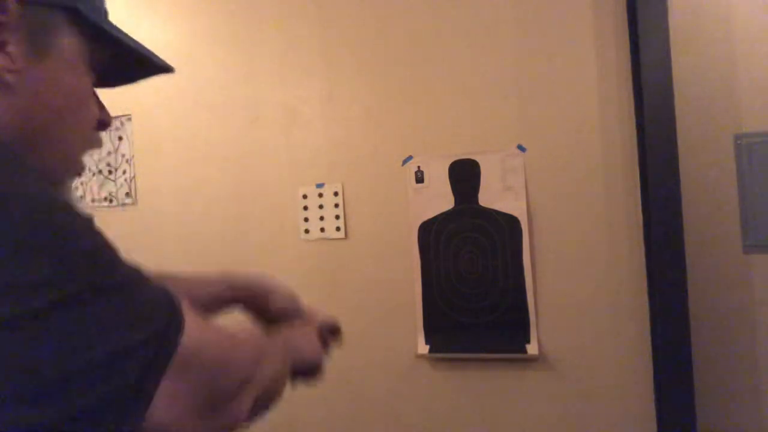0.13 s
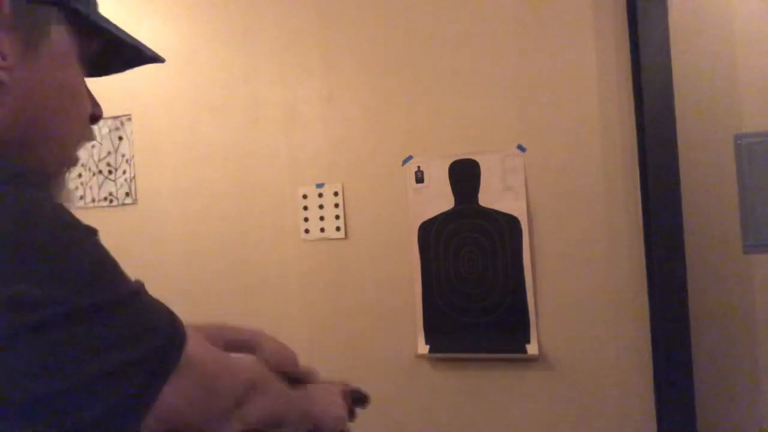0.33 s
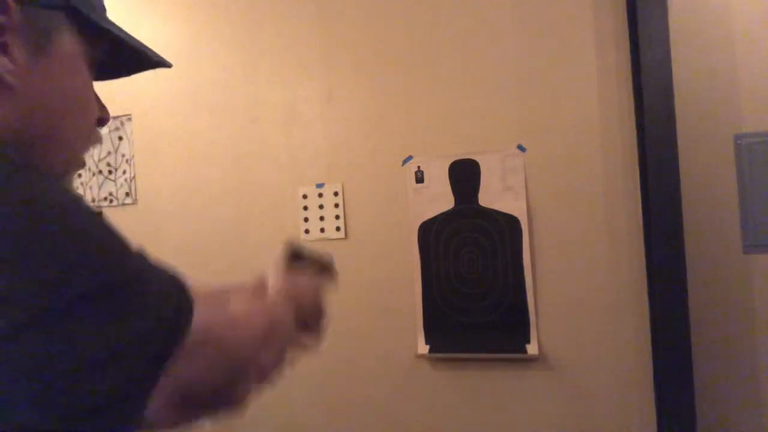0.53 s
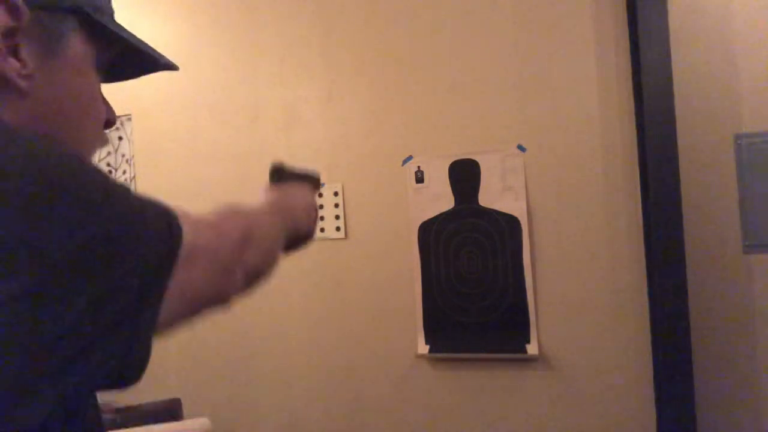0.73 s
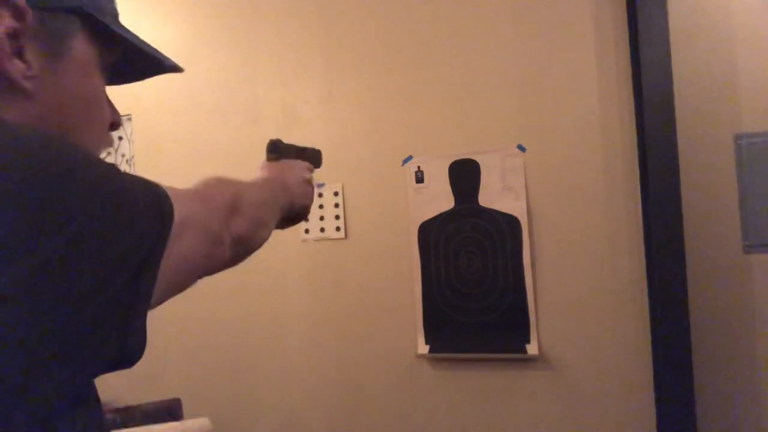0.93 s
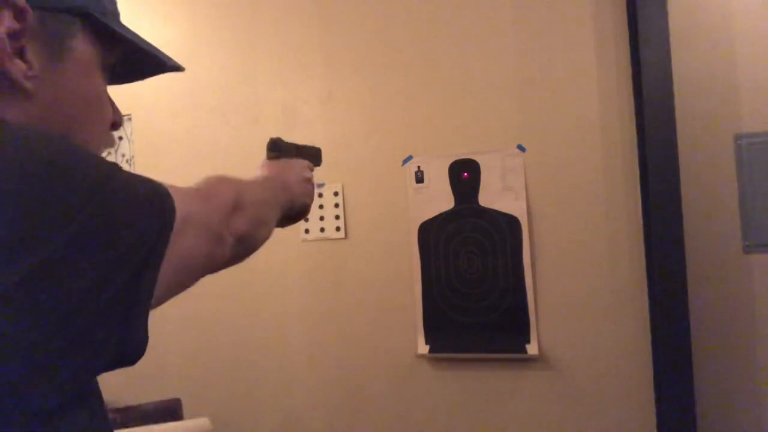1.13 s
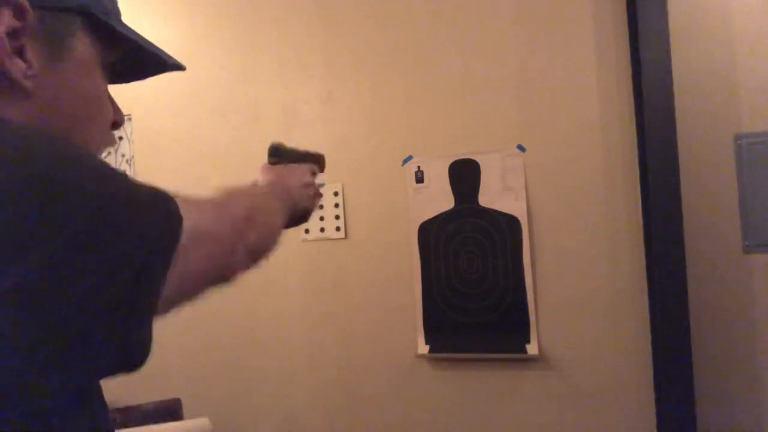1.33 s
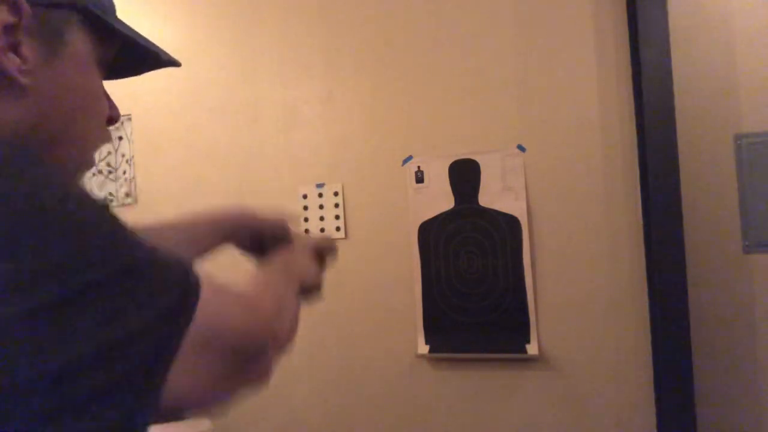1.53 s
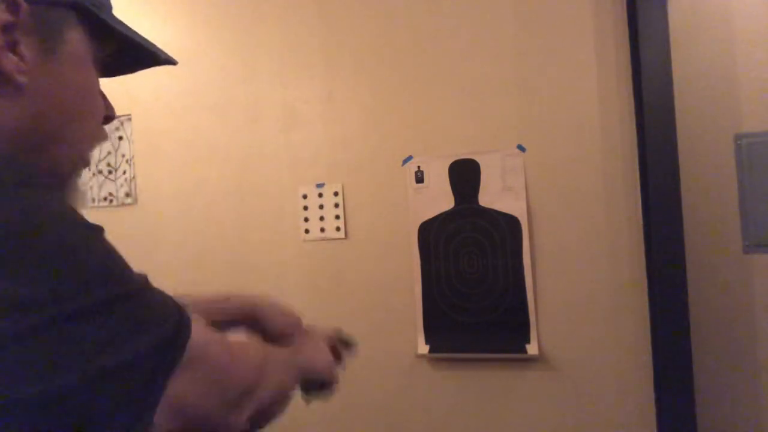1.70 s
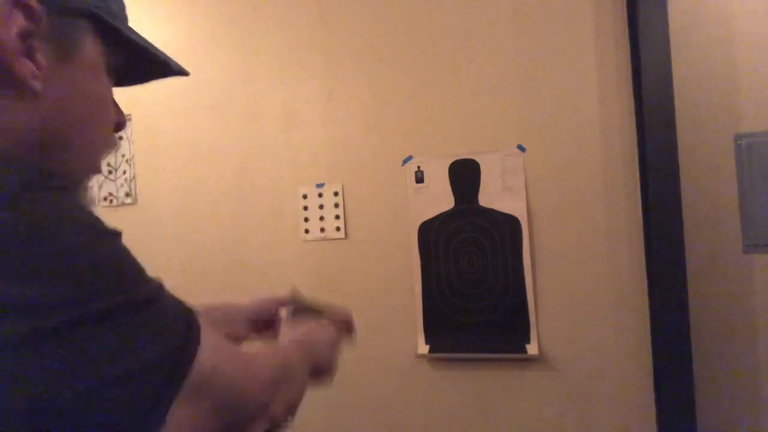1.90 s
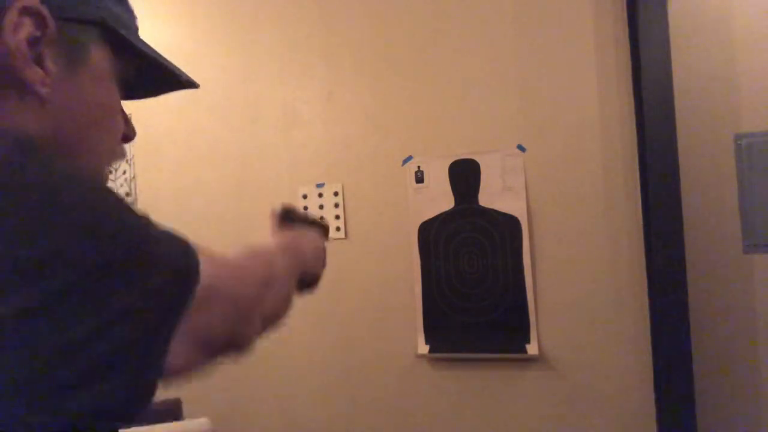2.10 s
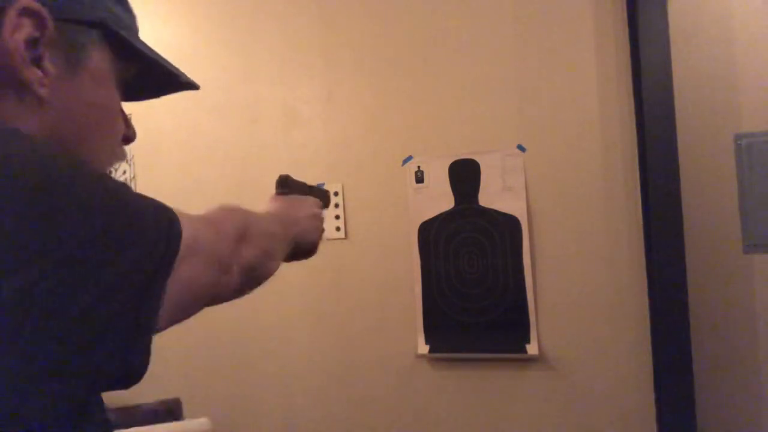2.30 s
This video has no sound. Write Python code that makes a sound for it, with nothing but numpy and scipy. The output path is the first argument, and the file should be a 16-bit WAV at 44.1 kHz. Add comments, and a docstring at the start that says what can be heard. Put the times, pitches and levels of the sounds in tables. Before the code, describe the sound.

A pistol slide is racked by hand in a small bare room. Light clicks and scrapes from 0.19 seconds lead to a rear-stop clack near 0.27, then a loud, ringing steel slam at 0.36. A single tight striker snap comes at 1.10. Faint handling clicks and scraping from about 1.6 precede a second slam at 1.76. Short wall reflections decay over steady, quiet low rumble.

```python
"""Low room rumble, then light clicks and scrapes as a hand racks a pistol's slide in a small bare-walled room.
Each rack: the slide scrapes to its rear stop, runs forward and slams shut; between the racks the striker snaps once.
Every blow is a short crack of filtered noise plus decaying modes of the struck steel; scrapes are gritty noise.
The walls answer with separate slaps and a diffuse tail; the rumble is steady filtered noise."""
import sys
import numpy as np
from scipy import signal
from scipy.fft import rfft, irfft
from scipy.io import wavfile
from scipy.ndimage import uniform_filter1d

SR = 44100
rng = np.random.default_rng(int(sys.argv[2]) if len(sys.argv) > 2 else 0)


def transcribe(u):
    """Save the signal u as a 16-bit wav file named by the first command-line argument.

    u: samples, shape (n,) or (channels, n), limited to [-1, 1]; the rate is SR.
    q: integer samples, one column per channel.
    """
    v = np.clip(np.atleast_2d(u).T, -1, 1)
    q = np.round(v * 32767).astype(np.int16)
    wavfile.write(sys.argv[1], SR, q)


N = 103635

# The slide catching, slamming shut and rattling home. Each row: start in seconds, relative level in dB,
# tilt in dB per octave, relative ring level in dB, squareness of the blow (-1 to 1), crack T60 in seconds.
SLIDE_SLAMS = [(0.3557, -8.5, 9, -11.5, -0.13, 0.0083), (.3600, 1, 1, -1.5, -0.91, 0.012),
               (.3728, -10.5, -2.5, -5.5, -0.88, .03), (1.7560, -11.5, 2.5, -11.5, 0.92, .005),
               (1.7600, -1, 1.4, -2.5, 1, 0.008), (1.7724, -8, -1.5, -1.5, 0.69, 0.031)]
# Colour of cracks at the slide, also used for the light clicks. Each row: frequency in Hz, relative level in dB.
SLIDE_CRACK_COLOUR = [(100, -48), (350, -33.5), (600, -19), (900, -15), (1200, -9), (2000, -2.5),
                      (3200, -0.5), (5000, 1.5), (6800, 3), (9000, -1), (12000, -7), (16000, -11)]


def undb(db):
    """Decibels to amplitude gain."""
    return 10 ** (np.asarray(db) / 20)


def unit(x):
    """Scale to unit energy."""
    return x / np.sqrt(np.sum(x ** 2) + 1e-18)


def add(out, start_s, x):
    """Mix x into out from start_s seconds, cutting what runs past the end."""
    i = max(int(start_s * SR), 0)
    out[i:i + len(x)] += x[:len(out) - i]


def noise(size):
    """Random-phase noise with a flat spectrum and rms 1."""
    phase = 2 * np.pi * rng.random(size // 2 + 1)
    return unit(irfft(np.exp(1j * phase), size)) * np.sqrt(size)


def fade(t, t60):
    """Exponential decay by 60 dB in t60 seconds."""
    return np.exp(-np.log(1000) * t / t60)


def colour(x, points, tilt_db=0):
    """Causal minimum-phase filter through (Hz, dB) points, tilted in dB per octave around 4 kHz."""
    size = 2 * len(x)
    hz = np.fft.rfftfreq(size, 1 / SR)
    p = np.array(points)
    db = np.interp(np.log(hz + 1), np.log(p[:, 0]), p[:, 1])
    db = db + tilt_db * np.log2(np.maximum(hz, 400) / 4000)  # the tilt stays flat below 400 Hz
    # folding the cepstrum onto positive times gives minimum phase
    cepstrum = irfft(np.log(undb(db)))
    cepstrum[1:size // 2] *= 2
    cepstrum[size // 2 + 1:] = 0
    response = np.exp(rfft(cepstrum))
    return irfft(rfft(x, size) * response)[:len(x)]


def burst(t60, hold=0, size=8192, count=3):
    """A dense crack, even across frequency: noise held while the contact chatters, then quickly damped."""
    t = np.arange(size) / SR
    attack = 1 - np.exp(-t / .0003)  # time constant in seconds
    x = noise(size) * fade(np.maximum(t - hold, 0), t60) * attack
    for _ in range(count):
        # flatten the spectrum, then cut what this spreads past the end of the crack
        spectrum = rfft(x)
        smooth_power = uniform_filter1d(abs(spectrum) ** 2, size=64)
        x = irfft(spectrum / np.sqrt(smooth_power + 1e-18)) * (t < t60 + hold)
    return unit(x)


def ring(modes, size=32768, count=7):
    """Decaying modes in close clusters of partials, with fresh random phases every time."""
    out = np.zeros(size)
    spread = .009  # relative half-width of a cluster
    for hz, db, t60 in modes:
        t = np.arange(min(size, int(1.2 * SR * t60) + 64)) / SR
        cluster = np.zeros(len(t))
        for k in np.linspace(-1, 1, count):
            cycles = hz * (1 + spread * k) * t + rng.random()
            cluster += np.cos(k) * np.sin(2 * np.pi * cycles)
        add(out, 0, undb(db) * unit(fade(t, t60) * cluster))
    return unit(out)


def blows(rows, points, chatter_s, crack_s, modes, ring_db):
    """Steel on steel: a crack of chattering contact, then the ring of the struck part."""
    out = np.zeros(N)
    for start_s, db, tilt_db, own_ring_db in rows:
        crack = unit(colour(burst(crack_s, chatter_s), points, tilt_db))
        add(out, start_s, undb(db) * crack)
        add(out, start_s, undb(db + ring_db + own_ring_db) * ring(modes))
    return out


def slams():
    """The slide shuts; how squarely it lands sets the balance of its steel modes."""
    # Ring of the slide. Each row: frequency in Hz, relative level in dB, T60 in seconds,
    # change in dB per unit of squareness.
    slide_modes = [(1173, -15.5, 0.22, -6), (1854, -7.5, 0.12, 5), (2004, -11, .3, 2.5),
                   (3400, -6, 0.15, -2.5), (4100, -10.5, 0.21, -3.5), (4640, -2, .4, -1), (4690, -4, .4, 4),
                   (5325, -8.5, 0.26, -2.5), (6083, -10.5, 0.66, 0), (6810, -5.5, .4, 6.5),
                   (7440, -7.5, 0.12, 4), (8600, -2.5, 0.19, -1), (9340, -11.5, .3, -3.5),
                   (10384, -2.5, .4, 0), (15270, -7, .22, 5.5)]
    out = np.zeros(N)
    for *row, square, crack_s in SLIDE_SLAMS:
        modes = [(hz, db + square * change_db, t60) for hz, db, t60, change_db in slide_modes]
        out += blows([row], SLIDE_CRACK_COLOUR, chatter_s=.0015, crack_s=crack_s, modes=modes, ring_db=-6)
    return out


def frame():
    """The frame answers each slam with a short hollow knock; duller blows knock harder."""
    # Frame knocked by the slide. Each row: frequency in Hz, relative level in dB, T60 in seconds.
    frame_modes = [(454, -10, 0.091), (620, -4, 0.12), (799, -4, .08), (1044, -4.5, .07),
                   (1182, 4.5, 0.036)]
    knock_db, dull_db = -12.5, 6.5  # relative level; its rise for each dB per octave of downward tilt
    out = np.zeros(N)
    for start_s, db, tilt_db, *_ in SLIDE_SLAMS:
        level_db = knock_db + db - dull_db * tilt_db
        add(out, start_s, undb(level_db) * ring(frame_modes, size=8192))
    return out


def stops():
    """The slide strikes its rear stop: a crack and a lower steel ring."""
    # Slide reaching the stop. Each row: start in seconds, relative level in dB, tilt in dB per octave,
    # relative ring level in dB.
    stop_rows = [(.2180, -23, -3.5, -5.5), (.2689, -13, -0.5, -3), (1.6445, -26.5, 3, -7.5)]
    # Colour of the stop's crack. Each row: frequency in Hz, relative level in dB.
    stop_colour = [(100, -16), (350, -12.5), (650, -1.5), (950, -0.5), (1300, 8.5), (2200, -0.5), (5000, 2),
                   (8000, -15), (16000, -14)]
    # Ring of the stop. Each row: frequency in Hz, relative level in dB, T60 in seconds.
    stop_modes = [(640, -6, .06), (1192, 2, .12), (1228, -3.5, .1), (1309, 4, 0.13), (1396, -10.5, .09),
                  (1800, -0.5, 0.17), (2590, -3, .06), (3700, -11, .1), (4500, -9.5, .12)]
    return blows(stop_rows, stop_colour, chatter_s=.0016, crack_s=.016, modes=stop_modes, ring_db=-4.5)


def rails(size=8192):
    """Gritty sliding friction between slide and frame: coloured noise in uneven stick-slip grains."""
    # Slide rubbing along its rails. Each row: start in seconds, length in seconds, level at start in dB,
    # level at end in dB.
    scrapes = [(0.186, 0.019, -44.5, -53), (0.212, 0.028, -46, -60), (0.295, 0.041, -60, -53.5),
               (0.332, 0.03, -46.5, -31.5), (1.575, 0.043, -74.5, -63.5), (1.636, .062, -40, -45.5),
               (1.702, 0.023, -52, -74), (1.726, 0.056, -49, -31.5)]
    # Colour of the rails. Each row: frequency in Hz, relative level in dB.
    rail_colour = [(100, -30.5), (500, -14), (1000, -10), (1330, 3.5), (1550, -4.5), (2500, -1.5),
                   (5000, -1), (8000, -13), (16000, -26.5)]
    out = np.zeros(N)
    t = np.arange(size) / SR
    for start_s, length_s, start_db, end_db in scrapes:
        grain_log_gain = .47 * rng.uniform(-1, 1, size // 64)
        grit = np.exp(np.repeat(grain_log_gain, 64))  # each grain lasts 64 samples
        rub = unit(colour(noise(size) * grit, rail_colour)) * np.sqrt(size)
        gate = np.clip(np.minimum(t, length_s - t) / .002 + .5, 0, 1)
        level_db = np.interp(t, [0, length_s], [start_db, end_db])
        add(out, start_s, rub * gate * undb(level_db))
    return out


def clicks():
    """Small contacts damped by the hands: a crack with one short resonance each."""
    # Light clicks of the parts and the grip. Each row: start in seconds, relative level in dB,
    # tilt in dB per octave, crack T60 in seconds, resonance in Hz.
    click_rows = [(.189, -39, -1.5, .04, 5600), (0.195, -41.5, 1, .012, 8500),
                  (0.2077, -26, -0.5, .014, 3450), (.2167, -24, -5, 0.02, 4570),
                  (0.2257, -21, 0, 0.025, 3570), (0.2293, -16.5, 3, 0.0048, 3395),
                  (0.2545, -31, -7, .02, 3370), (.3460, -20.5, -2, .025, 4340),
                  (0.35, -28.5, 1.5, .015, 4600), (0.706, -43, -8, .015, 6000),
                  (1.2524, -33.5, -4.5, 0.011, 5870), (1.4026, -43, -10, 0.014, 4210),
                  (1.490, -51, -3.5, 0.018, 5400), (1.608, -31, -2, .014, 3170),
                  (1.6203, -32, -5.5, 0.029, 2660), (1.6254, -34.5, -1, 0.0075, 8040),
                  (1.6408, -25, -7, 0.021, 6600), (1.6581, -17.5, 9.5, 0.006, 5530),
                  (1.669, -46, 5.5, .03, 6060), (1.693, -33, -4, .03, 1740),
                  (1.7436, -30.5, -5, 0.016, 2900), (2.2152, -41.5, 0.5, 0.014, 4440)]
    ring_db, ring_s = -3.5, .022  # resonance level relative to the crack; its T60
    out = np.zeros(N)
    for start_s, db, tilt_db, t60, hz in click_rows:
        crack = unit(colour(burst(t60), SLIDE_CRACK_COLOUR, tilt_db))
        add(out, start_s, undb(db) * crack)
        add(out, start_s, undb(db + ring_db) * ring([(hz, 0, ring_s)], size=4096))
    return out


def strikes():
    """The striker snaps: a very short crack and a tight, quickly damped ring."""
    # Striker falling, then rebounding. Each row: start in seconds, relative level in dB,
    # tilt in dB per octave, relative ring level in dB.
    strike_rows = [(1.0975, -28, -8, -5), (1.1015, -3.5, 2.5, -3.5), (1.1054, -27, 5.5, -4)]
    # Colour of the striker's crack. Each row: frequency in Hz, relative level in dB.
    striker_colour = [(100, -42), (400, -26), (800, -21.5), (1080, -1), (1500, -9.5), (2200, -4.5),
                      (3000, 5), (3750, -1), (4250, 2.5), (5000, -2.5), (5900, -6), (7800, 0), (10000, -8),
                      (12000, -7.5), (16000, -16.5)]
    # Ring of the striker. Each row: frequency in Hz, relative level in dB, T60 in seconds.
    striker_modes = [(1006.7, -9.5, 0.029), (1110, -6.5, 0.034), (2808, -2.5, .025), (3340, 3.5, .025),
                     (4127, 7, 0.043), (4360, 3, .03), (6970, -4, .07), (7540, -5, .04), (8635, -5, .1)]
    return blows(strike_rows, striker_colour, chatter_s=.0024, crack_s=.0041, modes=striker_modes, ring_db=-4.5)


def room(x, size=40000):
    """Slaps off the near surfaces, and a diffuse tail in which each band decays at its own rate."""
    # Slaps from floor and walls. Each row: delay in seconds, level in dB, tilt in dB per octave,
    # smear T60 in seconds.
    echoes = [(.0078, -18, -1, .004), (.0107, -15, -1, .002), (.0130, -15, 1, .02),
              (.0165, -19.5, -1, 0.02), (.0222, -21.5, 2, .003), (.036, -23.5, 1, .04),
              (.097, -31.5, 3.5, 0.047)]
    # Diffuse room sound. Each row: band centre in Hz, level in dB, T60 in seconds.
    tail_bands = [(201.4, -5, 0.24), (500, -10.5, .3), (998.6, -11.5, 0.67), (1860, -6.5, 0.66),
                  (3850, -11.5, 0.83), (6700, -7, 0.57), (10030, -10.5, .42), (16000, -13, .3)]
    early = np.zeros(size)
    for delay_s, db, tilt_db, smear_s in echoes:
        slap = colour(burst(smear_s), [(1, 0), (SR, 0)], tilt_db)  # flat but for its tilt
        add(early, delay_s, undb(db) * slap)

    t = np.arange(size) / SR
    hz = np.fft.rfftfreq(size, 1 / SR)
    onset = np.clip(t / .013 - .5, 0, 1)  # silent for 6.5 ms, then rising for 13 ms
    spectrum = rfft(noise(size))
    centres = np.log([row[0] for row in tail_bands])
    tail = np.zeros(size)
    # neighbouring bands crossfade on a log-frequency axis
    for share, (_, db, t60) in zip(np.eye(len(tail_bands)), tail_bands):
        band = irfft(spectrum * np.interp(np.log(hz + 1), centres, share))
        tail += undb(db) * band * unit(fade(t, t60) * onset)
    return signal.fftconvolve(x, early + tail)[:N]


def rumble():
    """Steady low room noise with a little hiss: filtered Gaussian noise."""
    # Colour of the room noise. Each row: frequency in Hz, relative level in dB per Hz.
    rumble_colour = [(15, -48), (30, -30), (46, 0.5), (75, -4.5), (110, 3.5), (150, -0.5), (250, -4.5),
                     (420, -8.5), (800, -12.5), (1300, -13.5), (2000, -19.5), (5500, -25), (9000, -32.5),
                     (16000, -40.5)]
    hum = unit(colour(rng.standard_normal(N), rumble_colour)) * np.sqrt(N)
    return undb(-58) * hum  # rms in dB


def scene():
    """The racks close to the body and the striker at arm's length, heard in the room."""
    racks = undb(13) * slams() + frame()
    racks += undb(12.5) * stops() + rails() + undb(12) * clicks()
    striker = undb(10.5) * strikes()
    # with arms stretched out the striker excites less room but gets one strong slap off the wall
    out = racks + striker + room(racks + undb(-2) * striker) + rumble()
    add(out, .0107, undb(-8.5) * striker)
    return out[None]


def record(dry):
    """The recorder rounds the highest peaks and cuts the treble steeply above 15.8 kHz."""
    rounded = np.tanh(dry)
    top_cut = signal.ellip(10, .2, 80, 15800, fs=SR, output="sos")
    return signal.sosfilt(top_cut, rounded)


dry = scene()
out = record(dry)
transcribe(out)
```